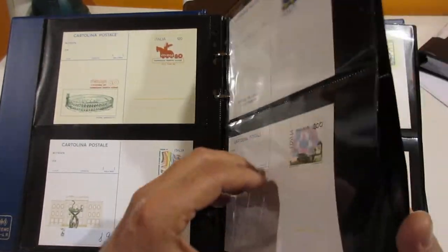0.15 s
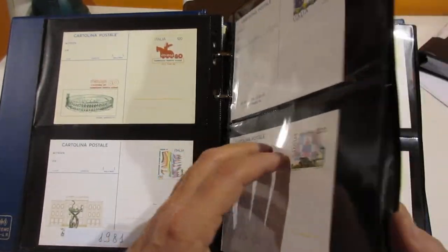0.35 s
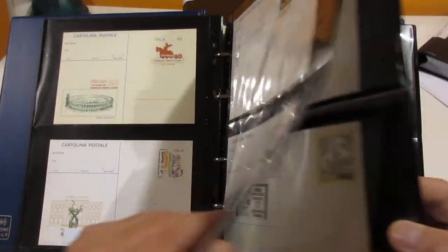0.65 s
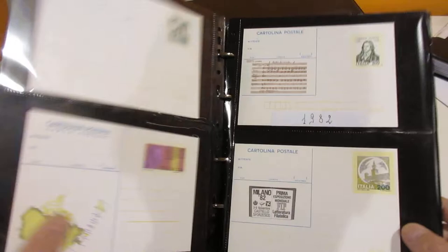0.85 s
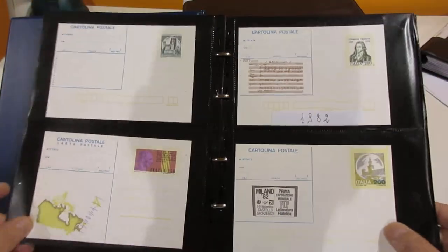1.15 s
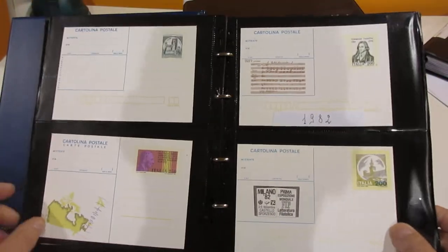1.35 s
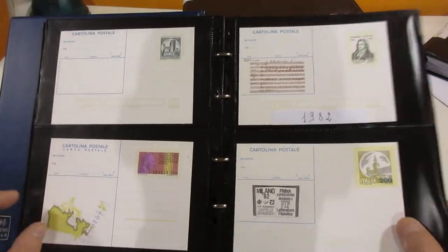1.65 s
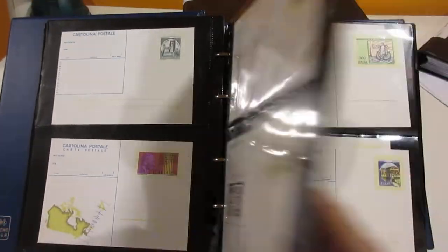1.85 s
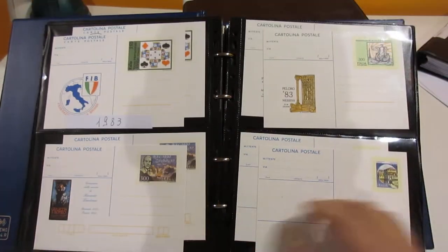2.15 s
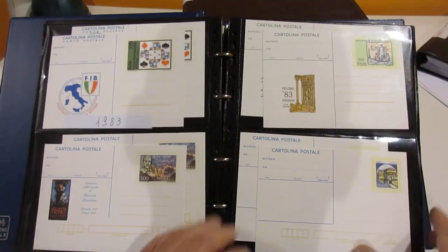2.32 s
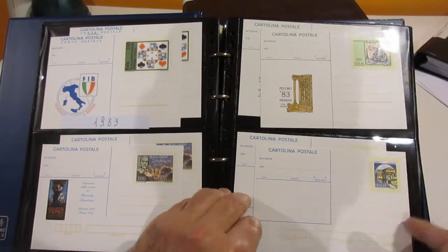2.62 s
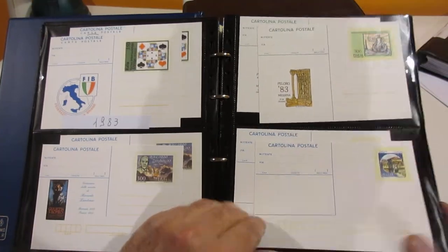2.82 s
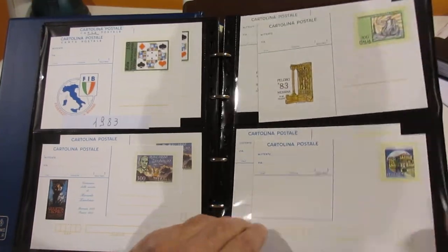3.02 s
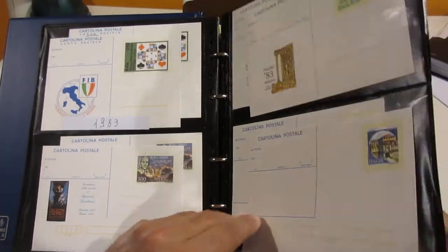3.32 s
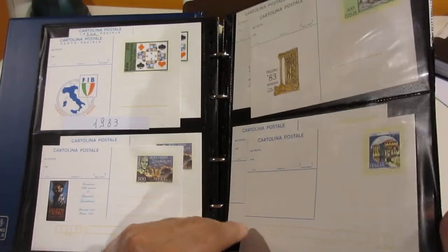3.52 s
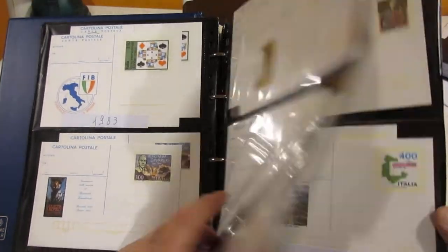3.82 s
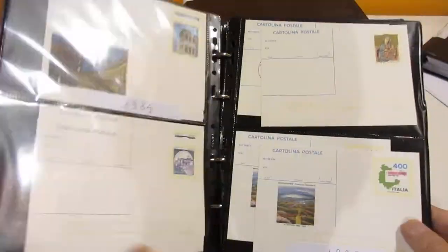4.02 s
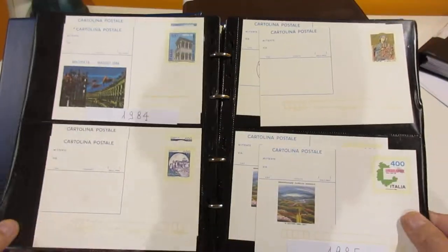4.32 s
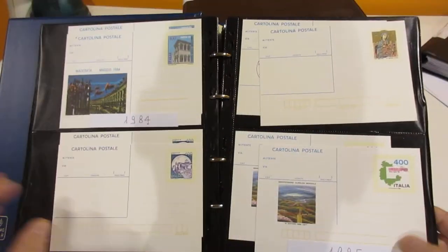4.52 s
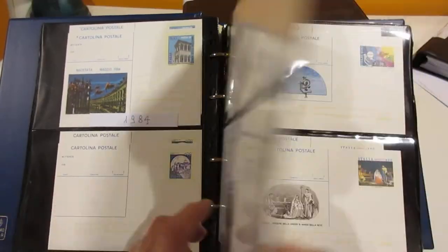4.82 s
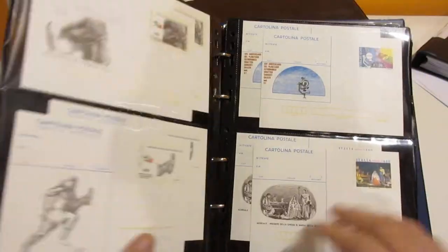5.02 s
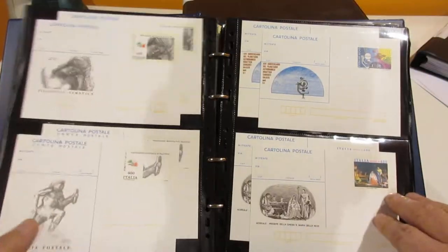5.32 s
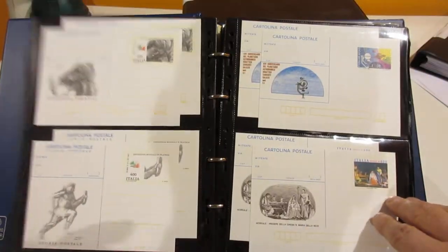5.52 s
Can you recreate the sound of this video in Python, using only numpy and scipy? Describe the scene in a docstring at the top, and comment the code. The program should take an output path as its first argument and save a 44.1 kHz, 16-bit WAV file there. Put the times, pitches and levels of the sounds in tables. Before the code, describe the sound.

A hand turns stiff plastic sleeves holding postcards in a ring binder. The plastic buckles in sharp, irregular snaps and crackles, with brief swishes as sleeves slide together and soft dull knocks as pages land. One loud pop stands out about a second in, and a busy flurry comes around four seconds. The handling sounds close, over the low steady rumble of a quiet room.

```python
"""Turning plastic sleeves in a ring binder

A hand turns stiff clear sleeves on a table in a quiet room. The film snaps as it buckles,
pockets of air and card pop, pages knock on the stack and slide on each other in stick-slip grains.
Faint crackle and rustle follow the handling, over a steady bed of room tone."""
import sys
import numpy as np
from scipy import signal
from scipy.fft import rfft, irfft, next_fast_len
from scipy.io import wavfile

SR = 44100
rng = np.random.default_rng(int(sys.argv[2]) if len(sys.argv) > 2 else 0)


def digitize_waveform(pressure):
    """Quantize a signal to 16-bit integers and store it at the path in sys.argv[1].

    Rows of a 2-D input are taken as channels; values are limited to [-1, 1].
    """
    field = np.atleast_2d(pressure).T
    bounded = np.clip(field, -1, 1)
    quanta = np.round(bounded * 32767).astype(np.int16)
    wavfile.write(sys.argv[1], SR, quanta)


N = 250047

# EQ curves of the room tone, the handling rumble and the film's hiss: frequency_hz, gain_db
ROOM_TONE_EQ = [(12, -68), (20, 1), (48, 2.5), (98, -33.5), (149, -18.5), (187, -7.5), (335, -32),
                (570, -17), (674, -48), (1350, -61), (2960, -21), (11600, -44), (15800, -86)]
RUMBLE_EQ = [(32, -31), (55, -4), (157, -4), (231, -1), (400, -6), (520, -12), (880, -120)]
FILM_EQ = [(710, 1), (1200, -3), (2010, 1.5), (2800, 0), (6440, -3.5), (12400, -10), (14400, -20),
           (15500, -8)]
# Resonances of the cards in their pockets: centre_hz, width_hz, gain_db
CARD_RESONANCES = [(803, 930, -38), (920, 450, -7), (1300, 360, -21.5)]
# Fader moves for the handling noise: time_s, film_db, card_db, rumble_db
HANDLING_FADERS = [(0.0, -43.5, -44.5, -55), (0.16, -46.5, -50, -55), (0.57, -47.5, -58, -57.5),
                   (0.79, -48.5, -44.5, -54.5), (0.98, -46, -50.5, -54.5), (1.2, -51, -55.5, -60.5),
                   (1.75, -57.5, -55.5, -59.5), (2.02, -54.5, -48.5, -61), (2.18, -63.5, -53, -59),
                   (2.45, -45.5, -66.5, -62.5), (2.61, -44.5, -61, -70), (2.95, -52.5, -52, -52.5),
                   (3.25, -46, -50, -53.5), (3.63, -51.5, -57, -57.5), (3.79, -45, -52.5, -54),
                   (4.03, -42.5, -48.5, -53), (4.36, -47, -58.5, -59.5), (4.67, -53, -55.5, -59),
                   (4.85, -48, -53, -55.5), (5.05, -49, -51, -51.5), (5.27, -44.5, -54.5, -55),
                   (5.67, -54, -53, -54.5)]
# Film sliding on film: start_s, length_s, gain_db, swell_db, centre_hz, treble_db
FILM_SLIDES = [(0.031, 0.061, -49.5, -12, 3870, -22), (0.066, 0.15, -50.5, -5, 2480, -27),
               (0.36, 0.04, -42.5, -2, 2620, -12), (0.389, 0.011, -28, -19, 4300, -26),
               (0.447, 0.022, -44.5, -6, 3500, -21), (0.668, 0.017, -52, 6, 3900, -11),
               (0.747, 0.089, -54.5, -8, 4540, 1), (1.403, 0.034, -54.5, 9, 3780, -6),
               (1.841, 0.055, -57, -5, 2820, -20), (1.926, 0.1, -56.5, -15, 3370, -7),
               (2.153, 0.044, -58, 0, 3560, -4), (2.573, 0.041, -40, -12, 5000, -27),
               (2.605, 0.04, -47, 25, 5150, -3), (2.868, 0.029, -48.5, 21, 5200, -17),
               (2.974, 0.09, -57.5, 0, 7400, -29), (3.103, 0.013, -52, -7, 4030, -19),
               (3.157, 0.056, -47.5, 4, 6860, -24), (3.248, 0.0832, -47, 17, 3950, 1.5),
               (3.419, 0.035, -48.5, 11, 4360, -14), (3.686, 0.022, -36.5, 29, 4550, -28),
               (3.915, 0.033, -39, 5, 6400, -26), (4.256, 0.046, -56, -1, 9400, 11.5),
               (4.407, 0.045, -48.5, 17, 6700, -27), (4.889, 0.02, -51, 1, 2270, 0.5),
               (4.926, 0.023, -51, 1, 2800, -7), (5.04, .052, -55, -2, 2300, -6),
               (5.18, 0.073, -60, -8, 2740, 8), (5.458, 0.034, -48.5, 9, 3680, -19)]
# A page knocks on the stack: peak_time_s, peak_db, pitch_hz
PAGE_KNOCKS = [(.0729, -18, 437), (.1649, -33.5, 407), (.4695, -33, 415), (.5111, -23.5, 416),
               (.9541, -34, 372), (1.163, -41, 90), (1.2811, -37.5, 393), (1.9399, -24.5, 430),
               (1.9953, -28, 430), (2.1931, -41, 227), (3.3148, -32.5, 420), (3.3338, -28, 390),
               (3.4051, -35, 420), (3.5964, -38, 410), (3.877, -37, 253), (3.9142, -32.5, 246),
               (4.0448, -56, 580), (4.1123, -25.5, 575), (4.652, -37, 382), (4.8459, -32, 402),
               (4.8935, -31.5, 425), (4.9022, -28.5, 409.5), (4.9189, -35, 410), (4.98, -35, 226),
               (5.05, -35, 400), (5.0784, -33.5, 420), (5.2218, -33.5, 480), (5.5999, -36, 225)]
# A pocket of air and card pops: peak_time_s, peak_db, pitch_hz
POCKET_POPS = [(.0194, -23.5, 910), (.0414, -18.5, 1830), (.0692, -11, 1340), (.0766, -26.5, 720),
               (.1863, -26, 1080), (.3774, -25, 1380), (.3938, -22, 1390), (.4676, -27.5, 1120),
               (.4826, -25, 1510), (.6173, -24, 1650), (.7576, -30, 900), (.812, -26.5, 893),
               (.8302, -20, 1030), (.9161, -26.5, 950), (.9494, -21, 1080), (1.082, -36, 1230),
               (1.161, 0.5, 1136), (1.2803, -28.5, 880), (1.4763, -17, 1790), (1.7511, -32, 1040),
               (1.936, -17.5, 1240), (2.4259, -24.5, 1160), (2.5087, -26, 1100), (2.8831, -30, 1090),
               (3.104, -33.5, 950), (3.1347, -31, 1450), (3.2447, -34, 910), (3.2784, -27.5, 1094),
               (3.4019, -29, 1110), (3.6999, -33, 1730), (3.8545, -32, 1070), (3.8814, -30.5, 1160),
               (3.9144, -25, 1630), (4.045, -10, 970), (4.1042, -12.5, 915), (4.1113, -14, 1060),
               (4.6514, -31, 1210), (4.939, -29, 1100), (5.037, -23.5, 1110), (5.0848, -32.5, 890),
               (5.2083, -23.5, 1300), (5.3288, -25.5, 1400), (5.3855, -27.5, 1080), (5.4997, -32, 1080)]
# The film buckles: peak_time_s, peak_db, centre_hz, nominal_length_ms, treble_db
FILM_SNAPS = [(0.0172, -11, 4480, 5.9, -33), (0.0394, -11.5, 4300, 0.68, -30), (0.0686, -8, 6000, 1.3, 2),
              (0.1654, -15, 3980, 0.9, 3), (0.186, -16, 6100, 1.8, -26), (0.279, -28, 4500, 1.4, -14),
              (.3753, -7, 11400, 2.0, 23), (0.392, 0, 12800, 3.1, 33), (.4467, -23, 3150, 1.6, -4),
              (0.4528, -24, 4670, 1.1, -5), (.4822, -25, 2170, 0.48, -23), (.4859, -4.5, 8000, 0.75, 4.5),
              (.51, -23.5, 3700, 1.7, -20), (.5592, -17, 5070, 0.66, 1), (0.616, -24, 2930, 3.8, -33),
              (.6434, -20.5, 3850, 0.23, -32), (.681, -24.5, 9600, .7, -10), (0.6865, -26, 3600, 0.63, -16),
              (0.7539, -17, 3280, 1.93, -25), (.7812, -23, 4670, 1.5, -1), (.8028, -28, 7400, .8, -10),
              (.807, -18, 5040, 1.0, -3), (0.8112, -16, 11900, 1.9, -7), (0.8285, -14.5, 3800, 1.9, -35),
              (0.8414, -17.5, 2370, 0.74, -35), (0.916, -18, 8500, 0.37, -9), (0.949, -12, 2360, 1.14, 1),
              (0.9519, -12, 4700, 2.0, -5), (1.01, -27, 5600, 0.67, -16), (1.1231, -29, 2800, 1.4, -20),
              (1.1568, -1, 9100, 0.7, -26), (1.1603, -3, 9900, 2.1, -6), (1.161, -8, 2250, 0.98, -19),
              (1.1753, -18.5, 3610, .7, 0), (1.1963, -29, 11600, .64, 0), (1.2676, -27, 10000, 1.1, -10),
              (1.279, -28.5, 2750, 1.9, -20), (1.393, -24.5, 5750, 0.35, -33),
              (1.4761, -4.5, 13700, 0.22, 6), (1.477, -13.5, 11550, 1.4, 21),
              (1.4858, -10.5, 2880, 2.1, -10), (1.5858, -29.5, 5230, .81, -16), (1.6346, -32, 8250, 1.3, 0),
              (1.661, -41, 4000, .8, -7), (1.7255, -28, 8250, 0.4, 2), (1.837, -34, 2870, 1.6, -11),
              (1.863, -37, 4800, 1.0, -8), (1.87, -28.5, 4530, 0.49, -4), (1.935, -11, 2050, 3, -2),
              (1.9662, -23, 6460, .73, -22), (1.9926, -25, 2980, 1.7, 6), (2.424, -23.5, 6700, 1.1, -20),
              (2.464, -25.5, 11500, 0.91, -7), (2.4844, -24, 6400, 0.36, -18), (2.517, -21, 6100, 0.77, -9),
              (2.541, -27, 2160, 1.5, -13), (2.5721, -16, 3800, 0.72, -14), (2.5895, -31, 5850, 1.6, -22),
              (2.635, -9, 3930, 2.34, -4), (2.6685, -22.5, 8050, 1.3, -23), (2.7892, -28, 3300, 1.5, -23),
              (2.888, -25, 5300, 1.5, -18), (2.8947, -17, 4970, 1.3, 3), (3.101, -28.5, 9850, 2, -5),
              (3.135, -29, 5000, .9, -4), (3.143, -21, 3320, 1.3, -10), (3.2786, -12, 3830, 1.3, -29),
              (3.3096, -36, 4130, 1.5, -8), (3.3264, -18.5, 3440, 0.92, -21), (3.378, -37, 10000, 1.5, 6),
              (3.402, -30, 2180, .92, -22), (3.4228, -24, 2650, 1.2, -16), (3.436, -13.5, 3500, .85, -4),
              (3.4426, -18.5, 7300, 2.1, -16), (3.5836, -22.5, 4080, 3.6, -9),
              (3.6737, -27, 11000, 0.61, -7), (3.6963, -28, 5360, 1.6, -16), (3.7045, -5, 3160, 0.88, -29),
              (3.8448, -11, 6850, 0.67, -26), (3.852, -20, 6760, 1.3, -23), (3.865, -16.5, 4620, 0.45, -20),
              (3.878, -17.5, 3300, 1.0, -16), (3.8953, -22, 7100, .54, -16), (3.905, -13.5, 6600, 2.2, -31),
              (3.9098, -8.5, 4270, 0.51, -29), (3.9132, -5, 6650, .9, -32), (3.935, -18, 7400, 0.78, -19),
              (3.9403, -23, 7700, .7, -16), (3.9788, -24.5, 3230, 1.8, -28), (3.9876, -21.5, 3200, .8, -26),
              (4.0445, -11, 2410, 0.67, -1.5), (4.0656, -20, 5600, 0.53, -5),
              (4.1039, -15, 3680, 0.84, -25), (4.1106, -7.5, 12600, 0.41, 2.5),
              (4.1374, -16, 3280, .9, -32), (4.176, -24.5, 6900, 0.66, -13), (4.65, -12.5, 2550, 1.2, 4.5),
              (4.7774, -25.5, 3800, 0.96, -20), (4.8096, -18, 3140, 0.45, -22),
              (4.8153, -30, 8300, 1.2, -8.5), (4.846, -24.5, 4200, 2.1, -6), (4.978, -27, 2240, .7, -13),
              (5.036, -14, 2550, 0.3, -5), (5.046, -23, 4180, 0.96, -10), (5.0835, -25.5, 6600, 1.2, -12),
              (5.1873, -20.5, 3450, .86, -11), (5.2069, -14.5, 8000, 1.3, 0),
              (5.21, -21.5, 2197, 0.67, -19.5), (5.2138, -26, 2410, 2.3, -16),
              (5.2169, -20, 3020, 0.86, -20), (5.2213, -24, 2790, 1.6, -17), (5.235, -26, 2440, 1.6, -19),
              (5.2868, -23, 9600, 1.0, -18), (5.3284, -13.5, 7320, 1.37, -33), (5.384, -20, 2760, 1.8, -2),
              (5.4564, -22, 5200, 0.52, -1), (5.483, -27, 7500, 2.4, -19), (5.5164, -28, 5300, 2.2, -5)]

ROOM_TONE_DB = -58.5
REVERB_DB, REVERB_T60_S, WALL_CUT_HZ = -22.5, .3, 8100
SHAKE_DB, SHAKE_RISE_S, SHAKE_FALL_S = -31.5, 0.025, 0.054
CRACK_BAND_HZ, FIZZ_BAND_HZ = (1350, 7200), (7200, 14500)
SETTLE_DELAY_S, SETTLE_LOSS_DB = .004, 19.5
HIGH_CUT_HZ = 14950


def from_db(db):
    """Decibels to gain."""
    return 10 ** (np.asarray(db) / 20)


def unit_rms(x):
    """Scale to an rms of 1."""
    return x / np.sqrt(np.mean(x ** 2) + 1e-20)


def place_hit(out, time_s, hit, peak_db):
    """Mix in a short hit, lined up and levelled by its peak."""
    peak = np.abs(hit).argmax()
    start = max(round(time_s * SR) - peak, 0)
    out[start:start + len(hit)] += (from_db(peak_db) * hit / np.abs(hit[peak]))[:N - start]


def resonance(x, hz, width_hz):
    """Two-pole band-pass with unity gain at its peak."""
    r = np.exp(-np.pi * width_hz / SR)
    gain = (1 - r * r) / 2
    return signal.lfilter([gain, 0, -gain], [1, -2 * r * np.cos(2 * np.pi * hz / SR), r * r], x)


def equalise(x, curve):
    """Shape x with an EQ curve and bring it to unit rms."""
    size = next_fast_len(N)
    hz, db = np.transpose(curve)
    bins_hz = np.arange(size // 2 + 1) * SR / size
    gain = from_db(np.interp(np.log(bins_hz + 1), np.log(hz), db))
    return unit_rms(irfft(rfft(x, size) * gain, size)[:N])


def drift(rate_hz):
    """A smooth random modulator of unit rms."""
    r = np.exp(-2 * np.pi * rate_hz / SR)
    return unit_rms(signal.lfilter([1], [1, -2 * r, r * r], rng.standard_normal(N + SR))[SR:])


def grains(per_s, spread_db):
    """Tiny random clicks of uneven size."""
    sizes = from_db(spread_db * np.minimum(rng.exponential(1, N), 5)) * rng.choice([-1, 1], N)
    return unit_rms(sizes * (rng.random(N) < per_s / SR))


def room_tone():
    """The bed: steady, bass-heavy noise of a quiet room."""
    return from_db(ROOM_TONE_DB) * equalise(rng.standard_normal(N), ROOM_TONE_EQ)


def room_reverb(x):
    """The walls return a dense, dull tail that starts a few milliseconds late."""
    t = np.arange(SR // 2) / SR
    tail = rng.standard_normal(len(t)) * from_db(-60 * t / REVERB_T60_S) * (t > .004)
    tail = signal.lfilter(*signal.butter(1, WALL_CUT_HZ, fs=SR), tail)
    return signal.fftconvolve(x, tail / np.sqrt(np.sum(tail ** 2)))[:N]


def card_shake_envelope():
    """Each pop leaves the cards shaking: quick attack, slower release."""
    kicks, t = np.zeros(N), np.arange(SR // 2) / SR
    for time_s, peak_db, _ in POCKET_POPS:
        kicks[round(time_s * SR)] = from_db(peak_db + SHAKE_DB)
    envelope = (1 - np.exp(-t / SHAKE_RISE_S)) * np.exp(-t / SHAKE_FALL_S)
    return signal.fftconvolve(kicks, envelope)[:N]


def handling_rustle(crackle_db):
    """Film hisses and crackles faintly, cards murmur in their pockets, a low rumble wavers below."""
    times_s, *faders_db = np.transpose(HANDLING_FADERS)
    t = np.arange(N) / SR
    film_gain, card_gain, rumble_gain = (from_db(np.interp(t, times_s, db)) for db in faders_db)
    hiss = rng.standard_normal(N) * from_db(2.86 * drift(14) + 2 * drift(86))
    crackle = from_db(crackle_db) * grains(per_s=150, spread_db=4)
    film = equalise(hiss + crackle, FILM_EQ)
    flutter = rng.standard_normal(N) * from_db(2.8 * drift(30))
    cards = unit_rms(sum(from_db(db) * resonance(flutter, hz, width) for hz, width, db in CARD_RESONANCES))
    rumble = equalise(rng.standard_normal(N) * from_db(0.5 * drift(29)), RUMBLE_EQ)
    return film * film_gain + cards * (card_gain + card_shake_envelope()) + rumble * rumble_gain


def film_patch(drive, hz, q, treble_db, crack_db):
    """A patch of film rings around its own pitch, layered with a broad crack and bright fizz."""
    body = resonance(resonance(drive, hz, hz / q), hz, hz / 1.2)
    crack = signal.sosfilt(signal.butter(2, CRACK_BAND_HZ, "band", fs=SR, output="sos"), drive)
    fizz = signal.sosfilt(signal.butter(2, FIZZ_BAND_HZ, "band", fs=SR, output="sos"), drive)
    return unit_rms(body) + from_db(crack_db) * unit_rms(crack) - from_db(treble_db) * unit_rms(fizz)


def film_slides(q, crack_db):
    """Dense stick-slip grains under each stroke, coloured by the patch that rubs."""
    out = np.zeros(N)
    friction = grains(per_s=8000, spread_db=3) * from_db(1.5 * drift(200))
    for start_s, length_s, gain_db, swell_db, hz, treble_db in FILM_SLIDES:
        span = np.arange(round(start_s * SR), round((start_s + length_s) * SR))
        swell = from_db(gain_db + swell_db * np.linspace(-.5, .5, len(span)))
        fades = signal.windows.tukey(len(span), .4)
        out[span] += swell * fades * film_patch(friction[span], hz, q, treble_db, crack_db)
    return out


def soft_hits(hits, q, partial_ratio, partial_db, grit, thump_ratio, thump_db):
    """A soft push rings a damped tone and one more partial; the air pushed out adds a thump."""
    out, t = np.zeros(N), np.arange(1600) / SR
    for time_s, peak_db, hz in hits:
        roughness = grit * rng.standard_normal(len(t)) * np.exp(-t * hz * 0.43)
        push = np.exp(-t * hz * 14.54) * t * hz + roughness
        tone = resonance(push, hz, hz / q)
        partial = from_db(partial_db) * resonance(push, partial_ratio * hz, hz / q)
        thump = from_db(thump_db) * resonance(push, thump_ratio * hz, 0.41 * thump_ratio * hz)
        cutoff_hz = 2.4 * max(partial_ratio, 1) * hz   # a soft contact has no top end
        hit = signal.lfilter(*signal.butter(2, cutoff_hz, fs=SR), tone - partial + thump)
        place_hit(out, time_s, -hit, peak_db)
    return out


def page_knocks():
    """Pages land on the stack with a low, dull knock."""
    return soft_hits(PAGE_KNOCKS, q=4.5, partial_ratio=2.1, partial_db=-8,
                     grit=.033, thump_ratio=.53, thump_db=-12)


def pocket_pops():
    """Pockets of air and card give a tight midrange pop."""
    return soft_hits(POCKET_POPS, q=2.4, partial_ratio=.75, partial_db=-4,
                     grit=.02, thump_ratio=.4, thump_db=-17)


def film_snaps(q, crack_db, decay_share, tail_db, tail_s):
    """A buckle runs along a crease: a burst of noise, a dying crackle, a weaker snap as it settles."""
    out, t = np.zeros(N), np.arange(-200, 900) / SR
    noise_pairs = rng.standard_normal((len(FILM_SNAPS), 2, len(t)))
    delays_s = SETTLE_DELAY_S * np.exp(.3 * rng.standard_normal(len(FILM_SNAPS)))
    for (time_s, peak_db, hz, length_ms, treble_db), pair, delay_s in zip(FILM_SNAPS, noise_pairs, delays_s):
        decay_s = decay_share * max(length_ms, .2) / 1000
        burst = np.exp(-np.abs(t) / np.where(t < 0, .2 * decay_s, decay_s))   # attack faster than decay
        tail = from_db(tail_db) * np.exp(-np.abs(t) / tail_s) * (t > 0)
        snap, settle = (film_patch(noise * (burst + tail), hz, q, treble_db, crack_db) for noise in pair)
        place_hit(out, time_s, snap, peak_db)
        place_hit(out, time_s + delay_s, settle, peak_db - SETTLE_LOSS_DB)
    return out


def scene():
    """Mono mix: the sleeves and their reverb over handling rustle and room tone."""
    sleeves = film_snaps(q=4.5, crack_db=-0.5, decay_share=0.41, tail_db=-26.5, tail_s=0.0078)
    sleeves += pocket_pops() + page_knocks() + film_slides(q=2.6, crack_db=6)
    bed = room_tone()
    reverb = from_db(REVERB_DB) * room_reverb(sleeves)
    return (sleeves + reverb + handling_rustle(crackle_db=-6) + bed)[None]


def record(dry):
    """Hard-clip the loudest peaks, then apply a steep high cut."""
    high_cut = signal.ellip(8, .5, 60, HIGH_CUT_HZ, fs=SR, output="sos")
    return signal.sosfilt(high_cut, np.clip(dry, -1, 1))


dry = scene()
out = record(dry)
digitize_waveform(out)
```